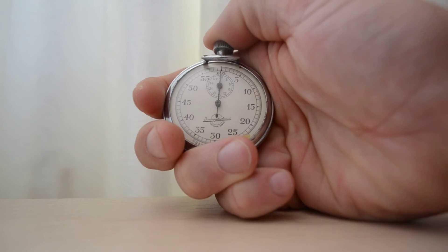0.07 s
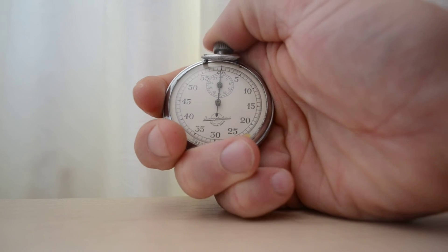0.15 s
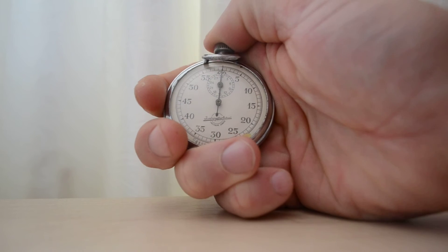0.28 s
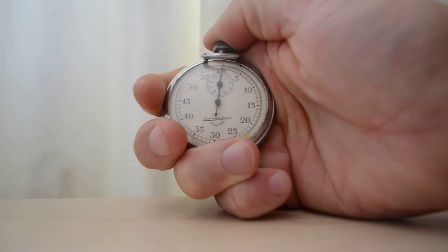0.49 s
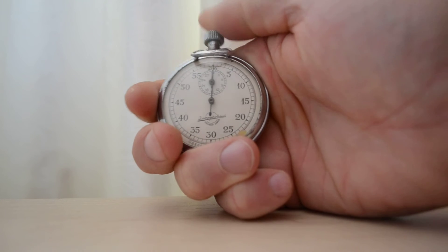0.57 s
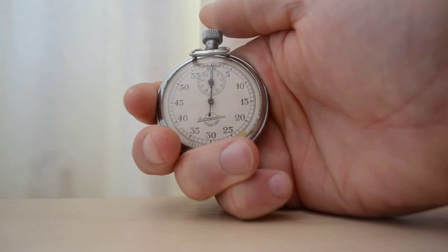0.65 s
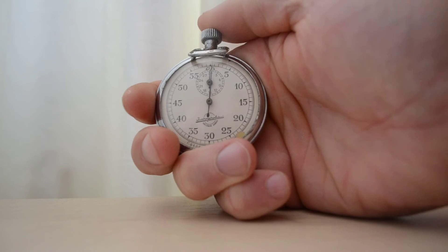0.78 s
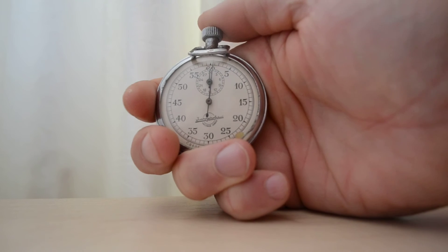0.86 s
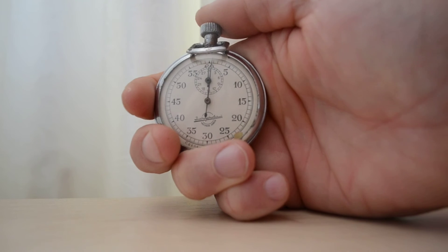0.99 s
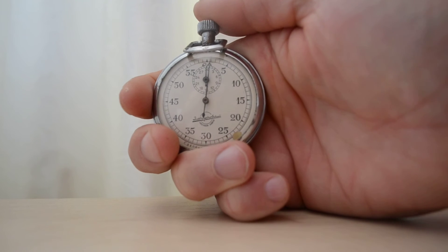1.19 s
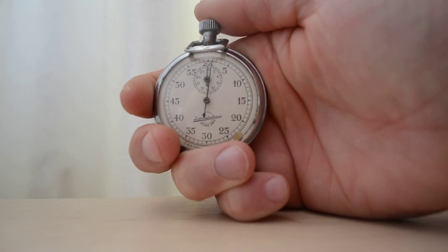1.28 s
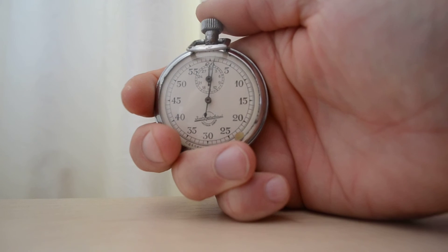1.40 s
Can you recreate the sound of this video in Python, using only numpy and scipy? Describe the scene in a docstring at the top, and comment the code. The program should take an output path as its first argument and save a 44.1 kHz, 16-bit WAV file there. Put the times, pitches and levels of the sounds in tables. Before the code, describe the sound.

Two metallic clicks of a stopwatch being pressed and released, with faint ticking behind.

```python
"""A mechanical stopwatch clicks as a thumb presses its crown (the top button) until it snaps,
then lets it spring back. Every blow rings the steel case and the springs inside.
The escapement, the part that lets the gears move step by step, ticks faintly five times a second.
A small, quiet room with a mains hum gives each click a short tail."""
import sys
import numpy as np
from scipy import signal
from scipy.fft import rfft, irfft
from scipy.io import wavfile

SR = 44100
rng = np.random.default_rng(int(sys.argv[2]) if len(sys.argv) > 2 else 0)


def generate_wav(signal):
    """Clip the signal to [-1, 1] and save it as 16-bit WAV at the path in sys.argv[1]."""
    frames = np.transpose(np.atleast_2d(signal))
    scaled = np.clip(frames, -1, 1) * 32767
    pcm = np.round(scaled).astype(np.int16)
    wavfile.write(sys.argv[1], SR, pcm)


N = 63945

# the tone of metal touching metal: (frequency [Hz], relative level [dB])
CONTACT_TONE = [(40, -19), (300, -16.5), (700, -9.5), (1300, -3.5), (3000, 1), (7000, -1), (11000, 1.5)]
# how the highest treble of every blow falls away: (frequency [Hz], gain [dB])
TREBLE_CUT = [(10000, 1.5), (11200, -5), (12000, -25.5), (13200, -26), (14500, -55)]


def amp(db):
    """Turns decibels into a number to multiply by."""
    return 10 ** (np.asarray(db) / 20)


def unit(x):
    """Scales a sound to an energy of one."""
    return x / np.sqrt(np.sum(x ** 2) + 1e-20)


def read(points, hz):
    """Reads between the rows of a table, with octaves evenly spaced."""
    f, value = np.transpose(points)
    return np.interp(np.log(hz + 1), np.log(f + 1), value)


def add(mix, start_s, sound):
    """Mixes a sound in at a given time."""
    part = mix[round(start_s * SR):][:len(sound)]
    part += sound[:len(part)]


def sharpest_pulse(gain):
    """The sharpest pulse that has these gains at each frequency and is silent before it starts."""
    spectrum = np.exp(np.conj(signal.hilbert(np.log(gain + 1e-7))))
    return np.fft.ifft(spectrum).real[:len(gain) // 2]


def pulse(points, size=2048):
    """A click whose tone follows a table of (frequency [Hz], level [dB])."""
    hz = abs(np.fft.fftfreq(size, 1 / SR))
    return sharpest_pulse(amp(read(points, hz)))


def room_noise():
    """A steady hush with a few soft resonances and the hum of mains electricity."""
    # tone of the hush: (frequency [Hz], relative level [dB])
    hush_tone = [(20, -19), (70, -21), (110, -21.5), (170, -10.5), (300, -9), (450, -8.5), (650, -10.5),
                 (1100, -8.5), (1600, -12), (1900, -18.5), (2450, -21), (3200, -25), (3800, -25),
                 (4150, -26), (4900, -27.5), (5550, -26), (5900, -32.5), (6900, -36), (7800, -41),
                 (9600, -40.5), (10600, -48.5), (11800, -63), (14000, -70.5)]
    # resonances, narrow bands where the noise is stronger: (frequency [Hz], width [Hz], level [dB])
    resonances = [(1005, 35, -74), (2827.9, 210, -73.5), (4502.6, 170, -79.5), (5120, 200, -84)]
    # tones of the hum: (frequency [Hz], level [dB])
    hum_tones = [(120, -70), (300, -75), (414, -76.5)]
    hz, t = np.fft.rfftfreq(N, 1 / SR), np.arange(N) / SR
    def noise(shape):
        return np.sqrt(N) * unit(irfft(rfft(rng.standard_normal(N)) * shape, N))
    peaks = sum(amp(db) * noise(1 / (1 + ((hz - f) / width) ** 2) ** 2) for f, width, db in resonances)
    hum = sum(amp(db) * np.sqrt(2) * np.sin(2 * np.pi * (f * t + rng.random())) for f, db in hum_tones)
    hush = amp(-61) * noise(amp(read(hush_tone, hz)))
    return hush + peaks + hum


def ring(hz, fade_s, t):
    """One ringing tone. Its fade time is how long it takes to drop by 60 dB."""
    return unit(np.cos(2 * np.pi * hz * t) * np.exp(-np.log(1000) * t / fade_s))


def case_ring(depth, size=8192):
    """The struck steel case rings with many tones, their balance set by how deep the crown sits."""
    # case tones: (frequency [Hz], fade time [s], relative level with crown up [dB], with crown down [dB])
    tones = [(1277.8, 0.006, -22.5, -9), (1851, 0.0068, -22, -4.5), (2263.9, .010, -10.5, -8.5),
             (2564.2, 0.012, -19.5, -4), (2671.2, .017, -2, -16), (2856.6, .02, -5.5, -12),
             (4039.9, .011, -12.5, -14.5), (4522, .008, -8, -19), (4879.9, 0.01, -3, -1.5),
             (6040.9, 0.0081, -8.5, -8.5), (6604.8, 0.0063, -30, -4.5), (7420.4, .011, -2.5, -13.5),
             (8666.3, .010, -7.5, -13), (9279.7, 0.0067, -7, -8.5), (9926.7, 0.011, -20, -13),
             (10811, .014, -19, -29.5)]
    hz, power = abs(np.fft.fftfreq(size, 1 / SR)), 0
    for f, fade_s, up, down in tones:
        offset = (hz - f) * 2 * np.pi * fade_s / np.log(1000)  # in half-widths of the tone's peak
        peak = 1 / (1 + offset ** 2) / (1 + (offset / 12) ** 2)  # falls twice as steeply past 12
        power = power + amp(up + depth * (down - up)) ** 2 * peak / peak.mean()
    rise_s = 0.0001  # the case takes a moment to start ringing
    onset = 1 - np.exp(-np.arange(size // 2) / (SR * rise_s))
    return sharpest_pulse(np.sqrt(power)) * onset


def spring_ring(depth, t):
    """The springs sing on after the case has gone quiet."""
    # their tones: (frequency [Hz], fade time [s], relative level with crown up [dB], with crown down [dB])
    tones = [(2390.6, .12, -31, -23), (2520.5, 0.11, -32.5, -21.5), (2609.4, .11, -18, -22.5),
             (2826, .06, -16.5, -28), (2943.7, .11, -29.5, -23.5), (4846.8, 0.081, -21.5, -19),
             (7599.2, .11, -25, -36)]
    return sum(amp(up + depth * (down - up)) * ring(hz, fade_s, t) for hz, fade_s, up, down in tones)


def scrape(t, decay_s):
    """Metal scrapes metal, making a tiny burst of noise."""
    burst = rng.standard_normal(len(t)) * np.exp(-t / decay_s)
    return unit(signal.fftconvolve(burst, pulse(CONTACT_TONE))[:len(t)])


def shape_blow(x, level_db, body_db, middle_db, treble_db):
    """Gives a blow its strength and brightness."""
    # where the body, an unchanged band, the middle and the treble lie: (frequency [Hz])
    bands = (1300, 2700, 4800, 8000)
    band_levels = list(zip(bands, (body_db, 0, middle_db, treble_db)))
    tone = signal.fftconvolve(pulse(band_levels), pulse(TREBLE_CUT))
    return amp(level_db + 10) * signal.fftconvolve(x, tone)  # every blow is raised by 10 dB


def crown():
    """Each blow rings case and springs. Returns the close sound and the crack thrown into the room."""
    # blows: (time [s], relative level [dB], crown depth [0-1], body [dB], middle [dB], treble [dB])
    blows = [(0.0407, -31, 0, 5, -6, -13), (0.2232, -5.5, 0.94, 2.5, 1, 1),
             (0.6058, -35, 0, -18, -1.5, -12), (0.6157, -18, 0.4, -9, -8.5, 3),
             (0.6178, -12, 0.01, -12, 1.5, 0), (0.7164, -37, 0, -17.5, -14, -13)]
    # the loudest snap's sharp, broad crack, with a splash of overload in its highest treble:
    # (frequency [Hz], relative level [dB])
    snap_tone = [(30, -9.5), (300, -9), (900, -8.5), (3000, -12.5), (7000, -13), (10500, -9.5),
                 (11700, -7.5), (13500, -22.5), (16500, -25)]
    near, crack, t = np.zeros(N), np.zeros(N), np.arange(SR // 5) / SR
    for start_s, level_db, depth, *tone in blows:
        metal = spring_ring(depth, t) + amp(-12.5) * scrape(t, decay_s=0.00043)
        add(metal, 0, case_ring(depth))
        add(near, start_s, shape_blow(metal, level_db, *tone))
        add(crack, start_s, shape_blow(unit(pulse(CONTACT_TONE)), level_db, *tone))
    add(near, start_s=0.2234, sound=amp(-9.5) * unit(pulse(snap_tone)))
    return near, crack


def room_tail(x, level_db):
    """Countless echoes blur into a tail, each frequency fading at its own speed."""
    # how long the room rings: (frequency [Hz], fade time [s])
    fade_times = [(300, 0.1563), (2500, 0.3885), (5000, 0.2361), (9000, 0.2546), (12000, 0.0817)]
    # tone of the tail: (frequency [Hz], relative level [dB])
    tone = [(100, 0), (1200, -1), (2000, -2.5), (2700, -1), (3700, -2), (4800, 1), (6000, -2), (7200, -2),
            (8000, -4.5), (9000, -3.5), (10200, -0.5), (11200, -3), (12000, -13.5), (13000, -5),
            (14000, -16)]
    hz, t, bands = signal.stft(rng.standard_normal(SR // 2), SR, nperseg=256)
    fade = np.exp(-np.log(1000) * t / read(fade_times, hz)[:, None])
    _, tail = signal.istft(bands * amp(read(tone, hz))[:, None] * fade, SR)
    response = np.zeros(SR // 2)
    add(response, start_s=0.0028, sound=amp(level_db) * unit(tail))
    return signal.fftconvolve(x, response)[:N]


def room_echoes(near, crack):
    """Sound bounces off the table and wall, then dies away in a short tail."""
    # the first bounces: (delay [s], relative level [dB])
    bounces = [(.0022, -21), (.0080, -27), (0.0108, -28), (0.018, -31)]
    response = np.zeros(SR // 10)
    for delay_s, db in bounces:
        add(response, delay_s, amp(db) * pulse(TREBLE_CUT))
    early = signal.fftconvolve(near, response)[:N]
    return early + room_tail(near, level_db=-28) + room_tail(crack, level_db=-19)


def escapement():
    """Small metal parts strike and ring: faint ticks, most led by a lighter one, no two quite alike."""
    # ticks: (time [s], relative level [dB], middle [dB], treble [dB])
    ticks = [(0.4379, -61, 9.5, 2), (0.4815, -50, 8.5, -2), (0.6855, -54.5, -5.5, 7),
             (0.8553, -62, -4, 1.5), (0.8862, -43, -7, -4.5), (1.0690, -63.5, -6.5, 0),
             (1.0930, -56.5, 9, 4.5), (1.2663, -60, -2, 1.5), (1.2927, -47.5, 0, 1)]
    # tones of the escapement: (frequency [Hz], fade time [s], relative level [dB])
    tones = [(2307.7, 0.033, -4), (2679.8, 0.018, -3.5), (2887.7, .035, -1), (4053.2, 0.012, -9),
             (4750, 0.0073, -10), (6233, 0.007, -12.5), (7340, 0.0046, -11), (8424, 0.0099, -4.5),
             (9323.7, 0.0089, -9), (10972, .012, -17)]
    out, t = np.zeros(N), np.arange(SR // 16) / SR
    rings = np.array([(-1) ** k * amp(db) * ring(hz, fade_s, t)
                      for k, (hz, fade_s, db) in enumerate(tones)])
    spread_db = 2  # each tick rings the tones a little differently
    for start_s, level_db, middle_db, treble_db in ticks:
        strengths = amp(spread_db * rng.standard_normal(len(rings)))
        metal = strengths @ rings + amp(-12) * scrape(t, decay_s=0.0012)
        add(out, start_s, shape_blow(metal, level_db, 0, middle_db, treble_db))
    return out


def scene():
    """The stopwatch close by, in its room."""
    clicks, crack = crown()
    near = clicks + escapement()
    return (near + room_echoes(near, crack) + room_noise())[None]


def record(dry):
    """Rounds off the peak of the loudest snap, then removes the very highest treble."""
    ceiling, cutoff_hz = 0.82, 16800
    rounded = dry / (1 + (dry / ceiling) ** 8) ** (1 / 8)
    low_pass = signal.firwin(511, cutoff_hz, window=("kaiser", 9), fs=SR)
    return signal.oaconvolve(rounded, low_pass[None], "same")


dry = scene()
out = record(dry)
generate_wav(out)
```